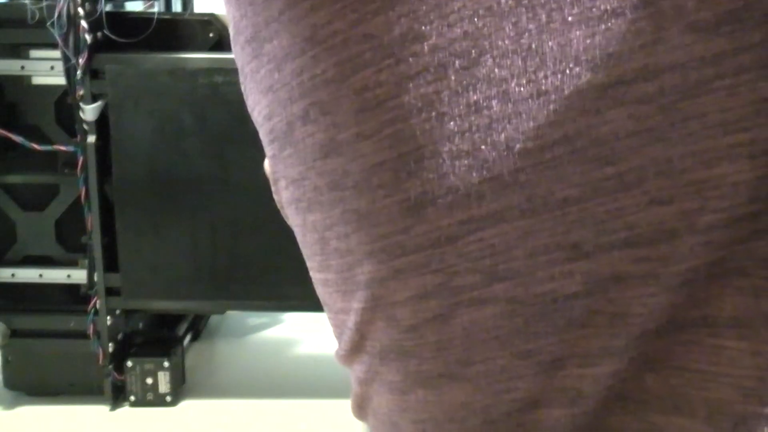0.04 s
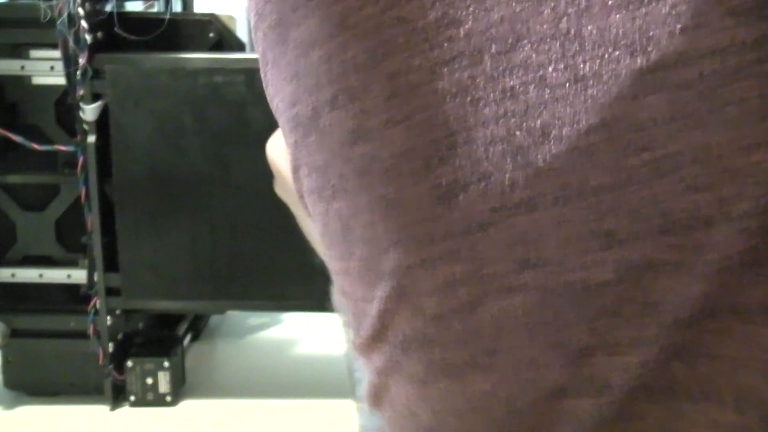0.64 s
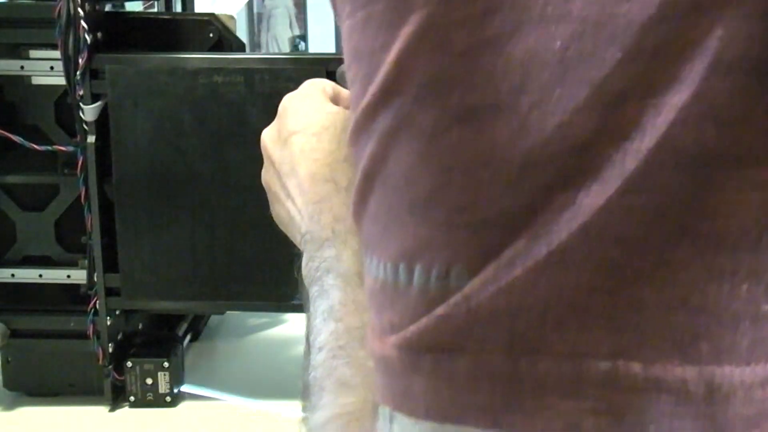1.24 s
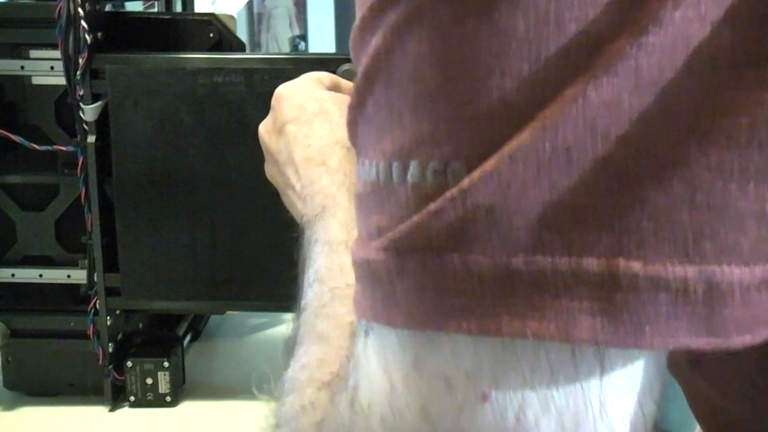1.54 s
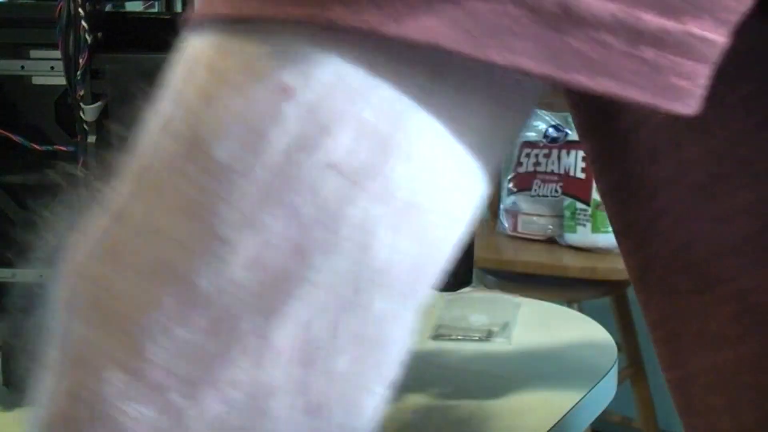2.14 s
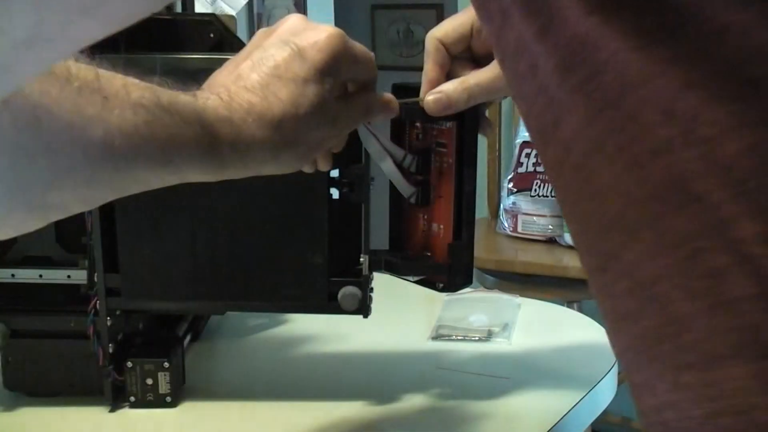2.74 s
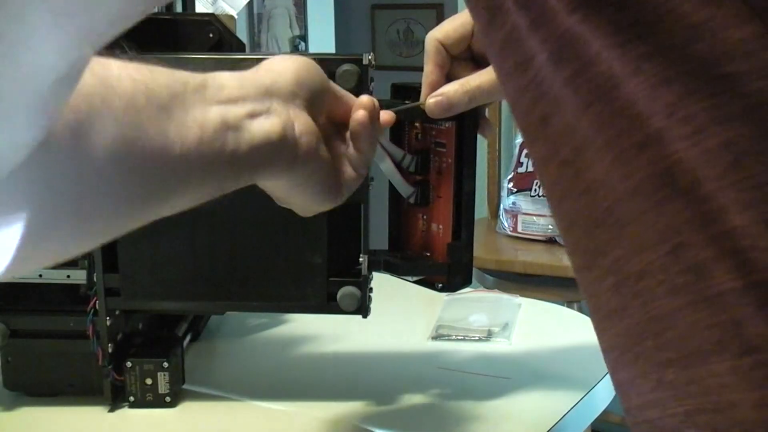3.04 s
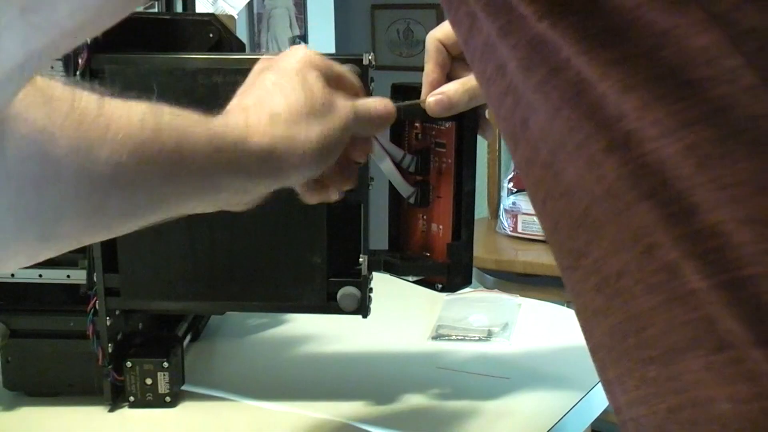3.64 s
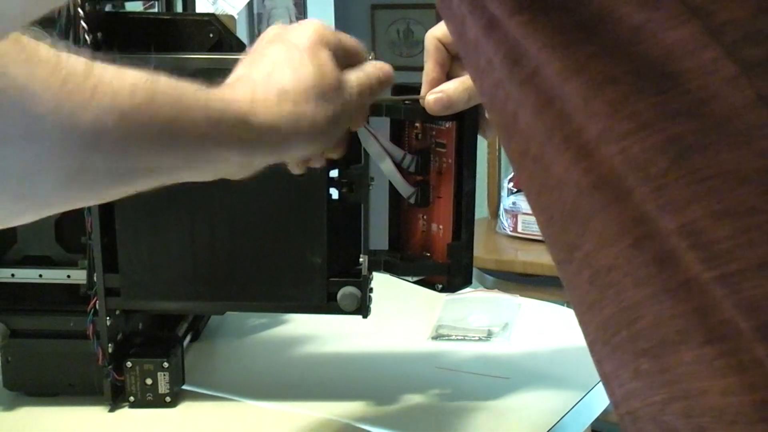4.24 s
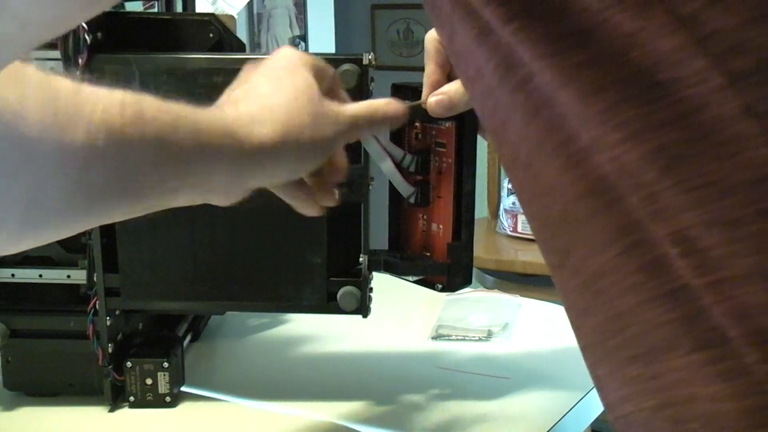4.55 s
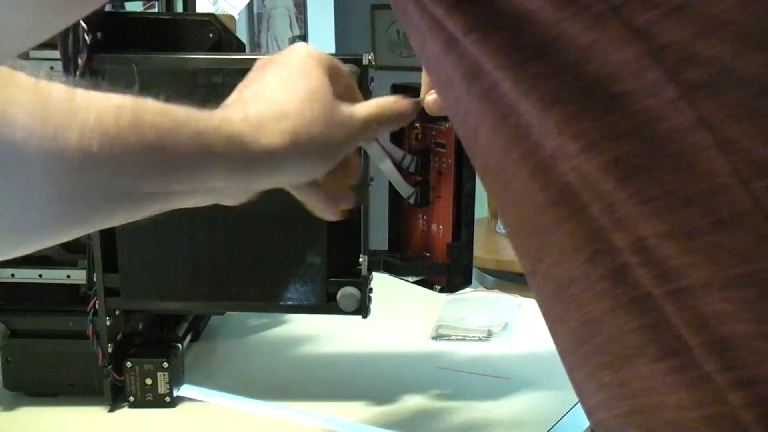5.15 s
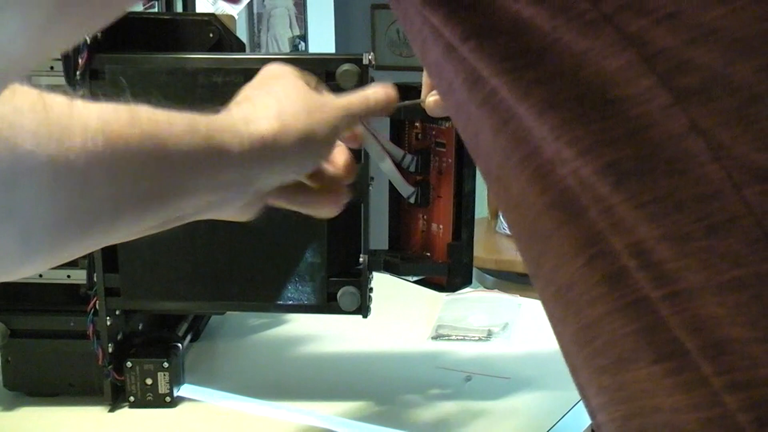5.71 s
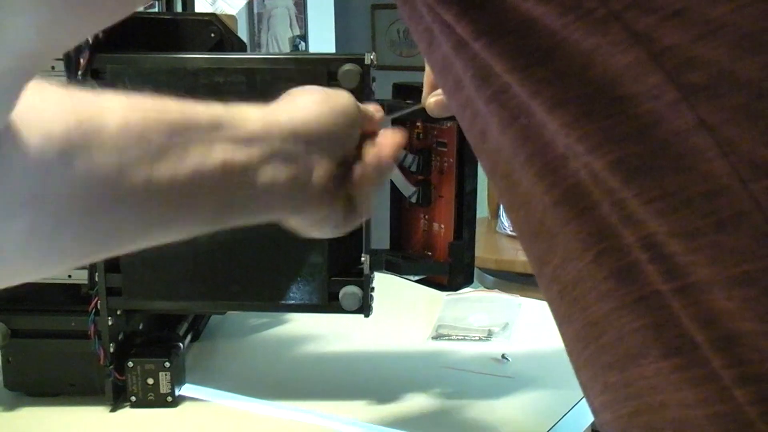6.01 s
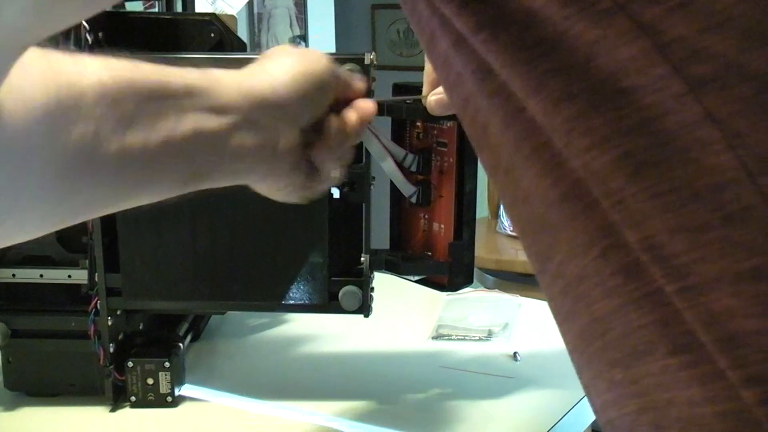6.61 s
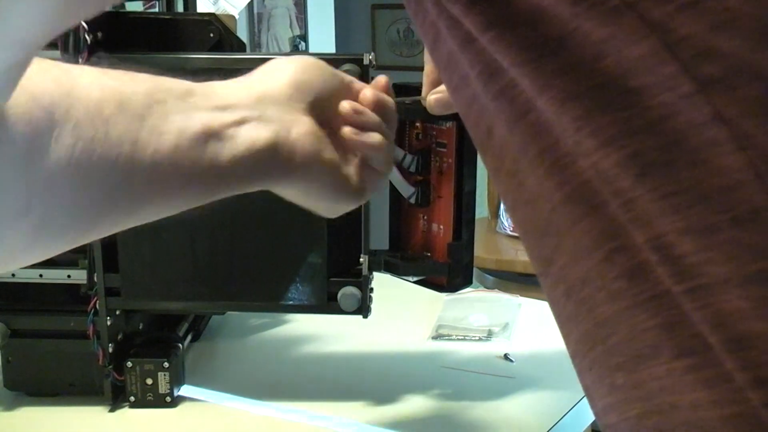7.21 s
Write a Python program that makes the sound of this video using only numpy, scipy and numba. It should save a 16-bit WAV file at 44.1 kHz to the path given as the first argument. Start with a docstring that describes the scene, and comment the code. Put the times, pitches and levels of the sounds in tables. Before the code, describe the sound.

A faint hum and hiss of a small workroom run throughout, and everything is heard close by. For the first 1.6 seconds, fingers rub lightly on a plastic cover and a hex key clicks softly in its socket. At about 1.8 seconds the tight screw gives with a low, rasping creak. Several sharp snags come around 2.8 seconds, leading into eight more short turns, roughly one every 0.6 seconds, until about 7.2 seconds. Each starts with a jerk, speeds from ticks into a brief squeal and slows again, growing brighter as the screw loosens. Soft, dull bumps of the hand taking a new grip fall between turns, mostly from 4.6 to 5.3 seconds. At about 5.7 seconds a loose steel screw drops and bounces on the bench with a few bright ticks, and the last three squeaky turns follow.

```python
"""Fingers rub on a plastic cover and a hex key clicks in its socket, close by, over a small workroom's hum.
The key then backs a tight screw out in nine short turns. Each is stick-slip friction: single ticks
speed up to a squeal and slow down again, exciting the modes of the cover. The hand bumps the frame
as it takes a new grip, and after the sixth turn a loose screw drops and bounces on the bench."""
import sys
import numpy as np
from scipy import signal
from scipy.fft import rfft, irfft
from scipy.io import wavfile
from numba import njit

SR = 44100
rng = np.random.default_rng(int(sys.argv[2]) if len(sys.argv) > 2 else 0)


def transcribe(u):
    """Save the signal u as a 16-bit wav file named by the first command-line argument.

    u: samples, shape (n,) or (channels, n), limited to [-1, 1]; the rate is SR.
    q: integer samples, one column per channel.
    """
    v = np.clip(np.atleast_2d(u).T, -1, 1)
    q = np.round(v * 32767).astype(np.int16)
    wavfile.write(sys.argv[1], SR, q)


N = 320739


def undb(db):
    """Decibels to amplitude ratio."""
    return 10 ** (np.asarray(db) / 20)


def unit(x):
    """Normalise a response to energy 1."""
    return x / np.sqrt(np.sum(x ** 2))


def on_log(hz, points):
    """Interpolate (Hz, value) points on a log-frequency axis."""
    f, value = np.transpose(points)
    return np.interp(np.log(hz + 1e-3), np.log(f), value)


def colour(x, points, treble_db=0, bass_db=0, size=2048):
    """Minimum-phase filter with the given spectrum and two shelves."""
    hz = np.fft.rfftfreq(size, 1 / SR)
    shelves = treble_db * hz ** 2 / (hz ** 2 + 6000 ** 2) + bass_db / (1 + (hz / 1500) ** 2)
    cepstrum = irfft(np.log(undb(on_log(hz, points) + shelves)))
    cepstrum[1:size // 2] *= 2
    cepstrum[size // 2 + 1:] = 0
    return signal.fftconvolve(x, irfft(np.exp(rfft(cepstrum))))[:len(x)]


def resonate(x, centre_hz, width_hz):
    """Two equal resonators in cascade; the output has rms 1."""
    hz = np.fft.rfftfreq(len(x), 1 / SR) + 1
    y = irfft(rfft(x) / (1 + 1j * (hz - centre_hz ** 2 / hz) / width_hz) ** 2, len(x))
    return y / np.std(y)


def fade(t60, size=16384):
    """Exponential damping: 60 dB in t60 seconds."""
    return np.exp(-np.log(1000) * np.arange(size) / SR / max(t60, 1e-4))


def burst(t60):
    """Modal overlap: countless close modes decay together as noise."""
    decay = fade(t60)
    return unit(decay * rng.standard_normal(len(decay)))


def blow(x, db):
    """Give an impact the energy of 4 ms at this level."""
    return unit(x) * undb(db) * np.sqrt(.004 * SR)


def add(out, s, x):
    """Superpose x on out at s seconds."""
    i = max(int(s * SR), 0)
    out[i:i + len(x)] += x[:max(N - i, 0)]


# Spectra of room air and rumble. Each row: frequency in Hz, relative level in dB.
AIR_SPECTRUM = [(120, -59), (200, -3), (353, -6), (499, -4.5), (527, -5.5), (863, -6.5), (1580, -8),
                (1930, -7), (2230, -11), (2990, -10.5), (3660, -12.5), (15800, -29.5)]
RUMBLE_SPECTRUM = [(20, -4), (30, 3), (45, -22), (90, -2.5), (170, -1.5), (230, -4), (350, -33)]
# Partials of the mains hum. Each row: frequency in Hz, level in dB.
HUM_PARTIALS = [(60, -89), (120.1, -63)]
def background(air_db=-65.5, rumble_db=-71, waver_db=1.3, knots=50):
    """Ambient noise, as mid and side: broadband air and rumble under a wavering mains hum."""
    spectra = (AIR_SPECTRUM, AIR_SPECTRUM, RUMBLE_SPECTRUM, RUMBLE_SPECTRUM)
    noises = (unit(colour(rng.standard_normal(N), points)) * np.sqrt(N) for points in spectra)
    air, air_side, rumble, rumble_side = noises
    t = np.arange(N) / SR
    waver = undb(waver_db * np.interp(t, np.linspace(0, t[-1], knots), rng.standard_normal(knots)))
    hum = sum(undb(db) * np.sqrt(2) * np.sin(2 * np.pi * (hz * t + rng.random()))
              for hz, db in HUM_PARTIALS)
    mid = undb(air_db) * air + undb(rumble_db) * rumble + waver * hum
    side = undb(air_db - 8) * air_side + undb(rumble_db - 5) * rumble_side
    return mid, side


# Finger strokes on the cover. Each row: middle in seconds, half length in seconds, level in dB.
FINGER_STROKES = [(0, 0.019, -49.5), (0.182, 0.033, -64), (0.4, .045, -56.5), (.77, 0.054, -66),
                  (1.25, 0.045, -62.5)]
def finger_rubs(grain_db=4, grain_samples=128):
    """Sliding friction: grainy noise from the fingers drives one broad resonance."""
    t = np.arange(N) / SR
    noise = rng.standard_normal(N)
    grains = np.repeat(undb(grain_db * rng.standard_normal(N // grain_samples + 1)), grain_samples)[:N]
    pressure = sum(undb(db) * np.exp(-((t - s) / half_s) ** 2) for s, half_s, db in FINGER_STROKES)
    return pressure * resonate(noise * grains, centre_hz=2960, width_hz=2800)


# Modes of cover, key and frame. Each row: frequency in Hz, T60 in seconds, relative energy in dB.
MODES = [(679, 0.057, -6.5), (1214, 0.24, -5), (1860, 0.048, -1.5), (2100, 0.01, -2), (2346, 0.043, -2),
         (3108, 0.036, -4.5), (3780, 0.043, -20), (4700, 0.063, -38.5), (6130, 0.066, -8.5),
         (6570, 0.046, -11), (6980, 0.032, -10), (7030, 0.06, -13), (8110, 0.12, -3.5)]
def ringing():
    """Free vibration: each mode is a damped sinusoid."""
    t = np.arange(len(fade(1))) / SR
    return sum(undb(db) * unit(fade(t60) * np.sin(2 * np.pi * (hz * t + rng.random())))
               for hz, t60, db in MODES)


# Sharp knocks: the key in its socket, and at 7.003 s a clicky knock of the hand taking its last grip. Each row:
# start in seconds, relative level in dB, treble shelf in dB.
KNOCKS = [(.051, -49, -48), (0.091, -48, -14), (0.329, -41.5, 17), (.412, -46.5, 12), (.602, -47.5, 9),
          (1.154, -56, 23), (1.555, -40, -22), (7.003, -50, -13)]
# Spectrum of a knock. Each row: frequency in Hz, relative level in dB.
KNOCK_SPECTRUM = [(180, -33), (300, 4), (515, -1), (828, -4), (1150, 8), (1760, 1), (2520, 6), (2780, 3.5),
                  (5440, 3), (15000, -32)]
def knocks(gain_db=2, ring_db=-13):
    """Impact excitation: the key strikes its socket, or the hand knocks the frame, and sets the modes ringing."""
    out = np.zeros(N)
    for s, db, treble_db in KNOCKS:
        knock = burst(t60=0.15) + undb(ring_db) * ringing()
        add(out, s, blow(colour(knock, KNOCK_SPECTRUM, treble_db), db + gain_db))
    return out


def cover(rattle_db=-6, modes_db=-11):
    """Impulse response of the cover, drawn anew each time: a crack, a plastic rattle and the modes."""
    rattle = burst(t60=0.081)
    return signal.unit_impulse(len(rattle)) + undb(rattle_db) * rattle + undb(modes_db) * ringing()


# Spectrum of the creak, in jerks and turns alike. Each row: frequency in Hz, relative level in dB.
CREAK_SPECTRUM = [(30, -37), (70, -36), (130, -20.5), (220, -15), (420, -22.5), (680, -16), (950, -13.5),
                  (1500, -6.5), (2000, -9.5), (3200, -2.5), (4300, -2.5), (6500, -3), (8500, -10),
                  (15800, -18.5)]
def jerk(db, treble_db=0):
    """Static friction gives way: a few milliseconds of grinding radiate through the cover."""
    grinding = signal.fftconvolve(burst(t60=0.022), cover())
    return blow(colour(grinding, CREAK_SPECTRUM, treble_db), db)


@njit
def slips(hz, sizes):
    """Relaxation oscillation: a pulse whenever the thread lets go, and the seconds since the last."""
    pulses, age = np.zeros(len(hz) + 1), np.zeros(len(hz))
    phase, k, since = .5, 0, 1.
    for i in range(len(hz)):
        step = hz[i] / SR
        phase, since = phase + step, since + 1 / SR
        if phase >= 1:
            phase, k, since = phase - 1, k + 1, 0.
            pulses[i] += sizes[k] * phase / step  # shared between two samples
            pulses[i + 1] += sizes[k] * (1 - phase / step)
        age[i] = since
    return pulses[:-1], age


def rasp(hz, age, pulses, grit_s=0.0023, tick_db=-8):
    """Strain release: each slip ticks and grinds; slow slips have stored more, so each is bigger."""
    grind_rms = np.sqrt(hz * grit_s / 2 * (1 - np.exp(-2 / (hz * grit_s))))
    grind = np.exp(-age / grit_s) / grind_rms * rng.standard_normal(N)[:len(hz)]
    grit = grind + undb(tick_db) * pulses * np.sqrt(SR / hz)
    return grit / np.std(grit)


def head_rub(centre_hz, tight):
    """Friction of the screw head on the cover: a second of hollow resonance, stronger when tight."""
    return resonate(rng.standard_normal(SR), centre_hz, width_hz=480) * undb(-6.5 + 3 * tight)


# Spectral envelope of the squeal. Each row: frequency in Hz, relative level in dB.
SQUEAL_SPECTRUM = [(450, -19), (700, -18), (950, -21), (1250, -17), (1500, -18), (1850, -8), (2400, -4.5),
                   (2900, -10), (3600, -5.5), (4700, -11), (7000, -16), (12000, -20)]
def squeal(hz, harmonics=12, flutter_db=3.5, knots=20):
    """Self-excited oscillation: periodic slips give harmonics, each fluttering as the contact shifts."""
    cycles = np.cumsum(hz) / SR
    place = np.linspace(0, knots - 1, len(hz))
    out = np.zeros(len(hz))
    for k in range(1, harmonics + 1):
        flutter = np.interp(place, np.arange(knots), rng.standard_normal(knots))
        rms = undb(on_log(k * hz, SQUEAL_SPECTRUM) + flutter_db * flutter)
        out += rms * np.sqrt(2) * np.sin(2 * np.pi * (k * cycles + rng.random()))
    return out


def turn(t, row, tight, treble_db, crawl_hz=35.24, lock_hz=680, swell_db=11.5, release_s=0.044):
    """Stick-slip friction: the slip rate follows the wrist, uneven when slow, periodic when fast."""
    _, fastest, stop, top_hz, rise_s, head_hz, db = row
    fall_s = .039 + .03 * tight  # a tight screw stops more slowly
    speed = 1 / (1 + np.abs((t - fastest) / np.where(t < fastest, rise_s, fall_s)) ** 2.3)
    steady_hz = crawl_hz + (top_hz - crawl_hz) * speed
    lock_share = 1 / (1 + (lock_hz / steady_hz) ** 6)
    locked, unlocked = np.sqrt(lock_share), np.sqrt(1 - lock_share)
    rate_scatter, size_scatter = rng.standard_normal((1024, 2)).T
    jitter = .015 + .15 * (1 - lock_share) ** 2
    cycle = np.cumsum(steady_hz / SR).astype(int)
    hz = steady_hz * np.exp(jitter * rate_scatter[cycle])
    pulses, age = slips(hz, undb(3.5 * size_scatter))
    push = undb(db + swell_db * tight * (speed - 1.5)) * np.clip((stop - t) / release_s, 0, 1)
    friction = rasp(hz, age, pulses) * push
    bass_db = -1.5 + 8 * tight
    # Speeding up, locked, slowing down: locked slips feed the tone, so the rasp turns weak and thin.
    stages = [(unlocked * (t < fastest), bass_db),
              (locked * undb(-5), bass_db - 17),
              (unlocked * (t >= fastest), bass_db)]
    out = 0
    for share, shelf_db in stages:
        response = unit(colour(cover(), CREAK_SPECTRUM, treble_db, shelf_db))
        out = out + signal.fftconvolve(friction * share, response)
    tone = squeal(hz) * push * locked
    head = head_rub(head_hz, tight)[:len(t)] * push * unlocked
    out[:len(t)] += tone + head
    # Harmonics that sweep over a mode leave it ringing.
    return out + undb(-24) * signal.fftconvolve(tone, ringing())


# Turns of the key. Each row: start, fastest moment and stop in seconds, top slip rate in Hz,
# rise from half to full speed in seconds, resonance of the screw head in Hz, relative level in dB.
KEY_TURNS = [ (1.806, 1.978, 2.049, 374.3, 0.081, 2560, -25),
             (2.874, 3.034, 3.115, 924, 0.064, 3080, -27.5),
             (3.59, 3.744, 3.855, 908.4, 0.065, 2350, -27.5), (4.225, 4.35, 4.44, 1163, 0.046, 2050, -26.5),
             (4.784, 4.888, 4.994, 1209, 0.028, 2080, -26.5), (5.381, 5.51, 5.59, 1266, 0.054, 2040, -27),
             (5.95, 6.053, 6.189, 1188, 0.047, 2110, -27), (6.53, 6.671, 6.75, 1189, 0.06, 2337, -26.5),
             (7.05, 7.156, 7.22, 1305, 0.068, 2160, -26.5)]
def unscrewing(tight_hz=376.5, creep_delay_s=.004):
    """Static, then sliding friction: each turn jerks loose and creaks, brighter as the screw comes out."""
    out = np.zeros(N)
    for k, row in enumerate(KEY_TURNS):
        start, _, _, top_hz, _, _, db = row
        tight = (tight_hz / top_hz) ** 2  # near 1 when the screw barely turns, near 0 when it runs free
        treble_db = 3 + k - 5.5 * tight
        add(out, start, jerk(db + 7 - 5 * tight, treble_db))
        t = np.arange(start + creep_delay_s, row[2], 1 / SR)
        add(out, t[0], turn(t, row, tight, treble_db))
    return out


# Bumps of the hand taking a new grip. Each row: start in seconds, relative level in dB.
GRIP_BUMPS = [(2.698, -55), (4.187, -65.5), (4.602, -46.5), (4.666, -51.5), (4.743, -50), (5.132, -52),
              (5.278, -55.5)]
# Spectrum of a bump. Each row: frequency in Hz, relative level in dB.
BUMP_SPECTRUM = [(120, -19), (280, -6), (400, 1), (650, -9.5), (1000, -10.5), (3000, -30), (10000, -61)]
def hand_bumps(gain_db=5):
    """Soft impact: the hand excites mainly the low modes of the frame."""
    out = np.zeros(N)
    for s, db in GRIP_BUMPS:
        add(out, s, blow(colour(burst(t60=0.088), BUMP_SPECTRUM), db + gain_db))
    return out


# Snags before and after the second turn. Each row: start in seconds, level in dB.
SNAGS = [(2.766, -20), (2.782, -26), (2.79, -26.5), (2.805, -21), (2.851, -24), (3.123, -25), (3.141, -25)]
def thread_snags():
    """Isolated stick-slip events: the thread catches and lets go in single jerks."""
    out = np.zeros(N)
    for s, db in SNAGS:
        add(out, s, jerk(db))
    return out


# Bounces of the loose screw. Each row: start in seconds, tick level in dB, relative bench gain in dB.
SCREW_BOUNCES = [(5.6532, -22.5, -7), (5.7352, -31.5, -15), (5.751, -24, -19), (5.829, -32.5, -6.5),
                 (5.838, -27.5, -10), (5.9171, -27.5, -8.5)]
# Spectra of the steel tick and the bench. Each row: frequency in Hz, relative level in dB.
TICK_SPECTRUM = [(200, -16), (1000, -0.5), (2200, 9.5), (3500, 14.5), (5500, 11.5), (8000, 4.5),
                 (15000, -18)]
BENCH_SPECTRUM = [(100, -17), (220, -3), (400, -8.5), (800, -1.5), (1500, 5), (3000, 0.5), (6000, -1),
                  (10000, -10.5), (15000, -19.5)]
def dropped_screw(bench_db=9):
    """Hard impact: the brief contact of steel gives a bright tick, then the bench vibrates freely."""
    out = np.zeros(N)
    for s, db, body_db in SCREW_BOUNCES:
        add(out, s, blow(colour(burst(t60=0.0012), TICK_SPECTRUM), db))
        add(out, s, blow(colour(burst(t60=0.47), BENCH_SPECTRUM), db + body_db + bench_db))
    return out


# Reverberation of the workroom. Each row: frequency in Hz, T60 in seconds.
REVERB_TIMES = [(150, 0.67), (400, 0.67), (1000, 0.537), (2800, 0.4878), (7300, 0.52), (15000, 0.23)]
def room_tail(build_s=0.0027, bands=12, size=32768):
    """Diffuse field: reflections build up quickly and are absorbed sooner in the treble."""
    t, hz = np.arange(size) / SR, np.fft.rfftfreq(size, 1 / SR)
    noise = rfft(rng.standard_normal(size))
    centres = np.geomspace(REVERB_TIMES[0][0], REVERB_TIMES[-1][0], bands)
    tail = np.zeros(size)
    for centre, share in zip(centres, np.eye(bands)):
        band = irfft(noise * np.interp(hz, centres, share))
        tail += band * fade(on_log(centre, REVERB_TIMES), size)
    return unit(tail * (1 - np.exp(-t / build_s)))


def scene(room_db=-4, room_side_db=-11, near_side_db=-15, balance_db=0.17):
    """Mid-side stereo: two close capsules share the direct sound; reflections and room noise differ."""
    direct = unscrewing() + thread_snags() + knocks() + hand_bumps()
    direct += finger_rubs() + dropped_screw()
    mid, side = background()
    mid += direct + undb(room_db) * signal.fftconvolve(direct, room_tail())[:N]
    side += undb(room_side_db) * signal.fftconvolve(direct, room_tail())[:N]
    side += undb(near_side_db) * signal.fftconvolve(direct, burst(t60=0.037))[:N]
    return np.array([(mid + side) * undb(balance_db / 2), (mid - side) * undb(-balance_db / 2)])


def record(dry):
    """Band limiting: a steep elliptic low-pass cuts the top."""
    return signal.sosfilt(signal.ellip(10, .2, 80, 15900, fs=SR, output="sos"), dry)


dry = scene()
out = record(dry)
transcribe(out)
```